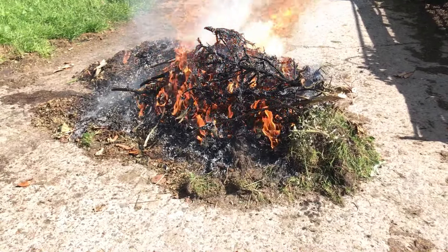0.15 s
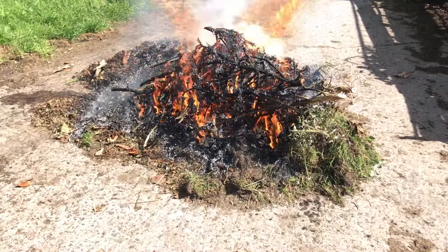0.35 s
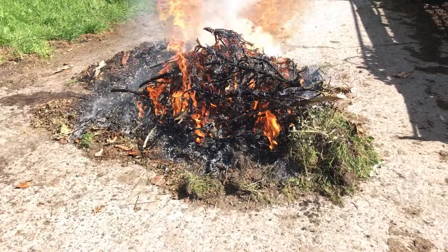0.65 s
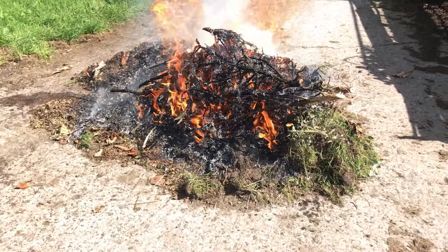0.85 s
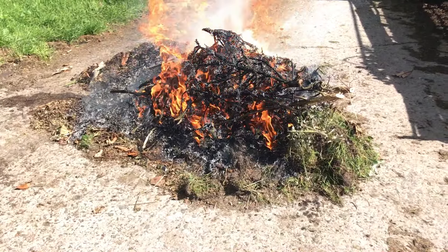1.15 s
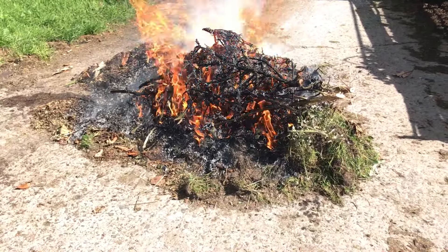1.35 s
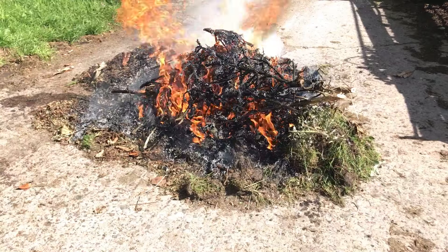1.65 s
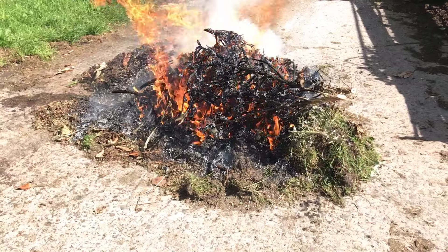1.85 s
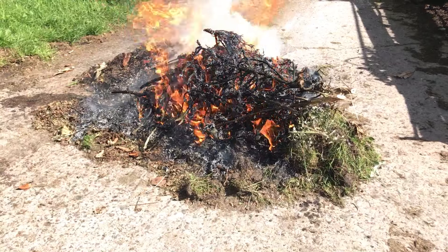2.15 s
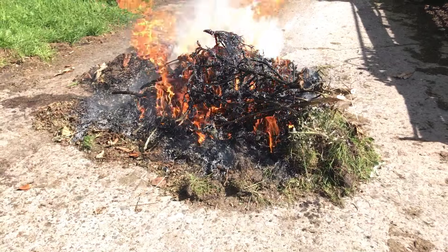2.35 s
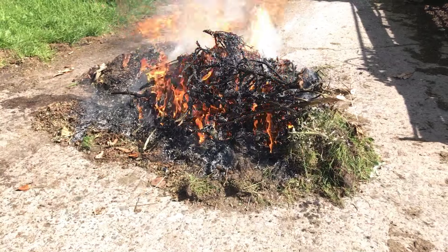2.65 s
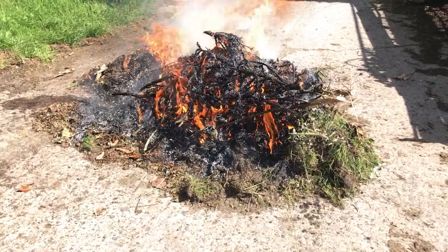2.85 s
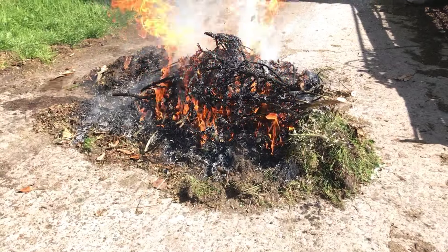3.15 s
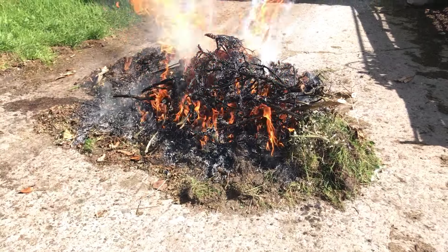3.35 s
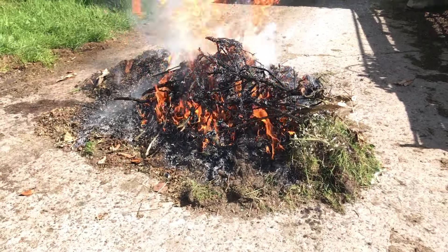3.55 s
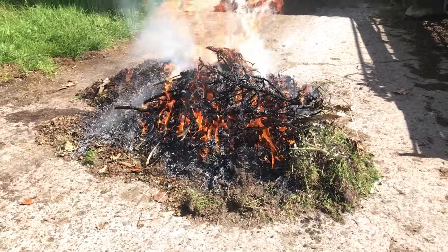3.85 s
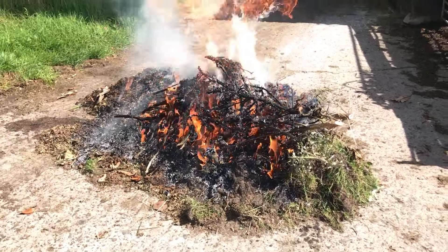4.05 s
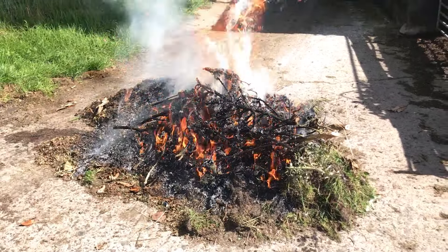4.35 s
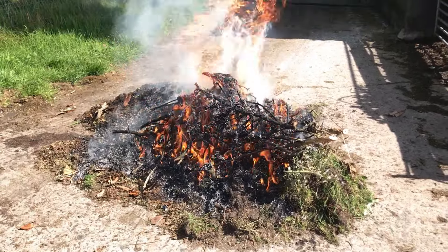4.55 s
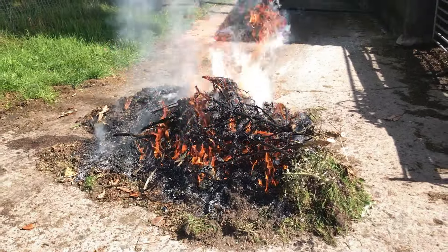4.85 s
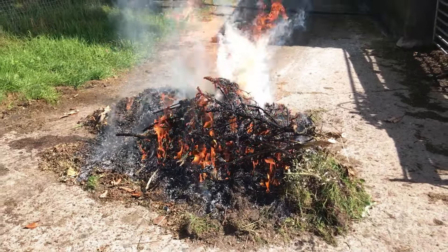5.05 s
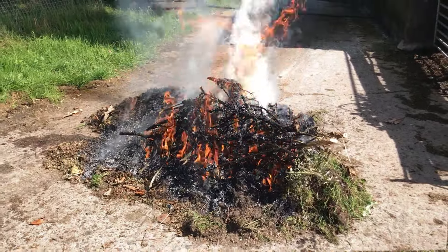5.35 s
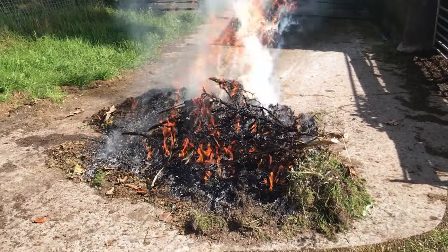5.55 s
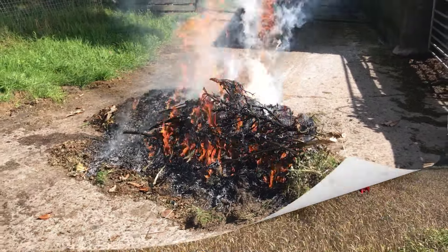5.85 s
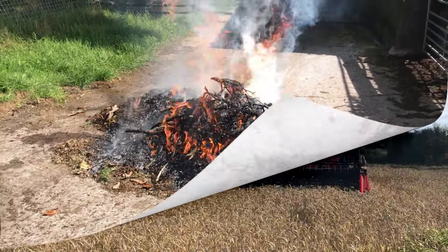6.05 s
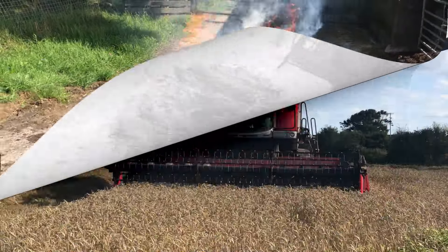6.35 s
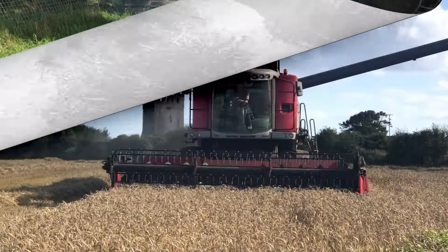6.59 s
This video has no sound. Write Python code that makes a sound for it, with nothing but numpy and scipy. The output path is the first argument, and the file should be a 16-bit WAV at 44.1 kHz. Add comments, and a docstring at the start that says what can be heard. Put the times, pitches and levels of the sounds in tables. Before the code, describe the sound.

A heap of cut weeds burns outdoors, crackling, popping and sizzling over fluttering flames, then fades, is cut off, and a faint distant engine emerges.

```python
"""Hard ground outdoors: a heap of cut weeds burns, fades along a straight ramp and is cut off; a farm machine fades in.
Stems burst as shock fronts with decaying noise, listed and random; smaller cells crackle as random impulses.
Sap sizzles as flickering hiss; turbulent flames rumble and rush as fluttering bands of noise.
A low knock, a damped swing of falling pitch, comes just before the cut; the distant engine is noise over a hum."""
import sys
import numpy as np
from scipy import signal
from scipy.fft import rfft, irfft, next_fast_len
from scipy.io import wavfile

SR = 44100
rng = np.random.default_rng(int(sys.argv[2]) if len(sys.argv) > 2 else 0)


def digitize_waveform(pressure):
    """Quantize a signal to 16-bit integers and store it at the path in sys.argv[1].

    Rows of a 2-D input are taken as channels; values are limited to [-1, 1].
    """
    field = np.atleast_2d(pressure).T
    bounded = np.clip(field, -1, 1)
    quanta = np.round(bounded * 32767).astype(np.int16)
    wavfile.write(sys.argv[1], SR, quanta)


N = 296345

FIRE_END_S = 6.355
FADE_START_S, FADE_ZERO_S = 4.245, 6.67   # the ramp would reach zero only after the cut
# base levels of the fire, before flares, vigour, flutter, filters and fade
BOOM_DB, RUMBLE_DB, RUSH_DB, SIZZLE_DB = -45, -41, -49.5, -38
# share of the flare-ups in the rumble; shares of the vigour in rumble and rush
RUMBLE_FLARES, RUMBLE_FOLLOWS, RUSH_FOLLOWS = 0.35, 0.73, 0.59
HISS_CUTOFF_HZ = 15750   # hiss and crackle pass a steep low-pass
# median rate of cells; level re the hiss before flicker; spread of size and of colour
CRACKLE_PER_S, CRACKLE_DB, CRACKLE_SPREAD_DB, CRACKLE_COLOUR_DB = 450, 1, 4, 4
# decay of a burst and of its fizz; starting level of the fizz; shock re the noise
POP_T60_S, POP_TAIL_T60_S, POP_TAIL_DB, POP_SHOCK_DB = 0.0042, 0.018, -16, 17
# lesser stems: mean energy dB in (middle, low, high), spread of strength and of colour
SMALL_POP_COUNT = 70
SMALL_POP_DB, SMALL_POP_SPREAD_DB, SMALL_POP_COLOUR_DB = (-20, -25, -10.5), 2.5, 3.5
THUMP_S, THUMP_HZ, THUMP_DB, THUMP_T60_S = 6.229, 71, -43.5, 0.23   # the pitch is the one it settles to
THUMP_EXTRA_HZ, THUMP_DROP_S = 880, 0.0029   # extra pitch at the start and its time constant
MACHINE_START_S, MACHINE_FULL_S, MACHINE_NOISE_DB = 6.375, 6.82, -60
CUTOFF_HZ = 16990


def from_db(db):
    """Level to amplitude: 20 dB is a factor of ten."""
    return 10 ** (np.asarray(db) / 20)


def rms_one(x):
    """Normalization to unit mean square along the last axis."""
    return x / np.sqrt(np.mean(x ** 2, axis=-1, keepdims=True) + 1e-20)


def in_time(rows):
    """Linear interpolation of a level contour at every sample."""
    s, level_db = np.transpose(rows)
    return np.interp(np.arange(N) / SR, s, level_db)


def drift(rate_hz):
    """Low-pass random process of unit spread: noise at every 40th sample through two equal poles."""
    r = np.exp(-80 * np.pi * rate_hz / SR)
    noise = rng.standard_normal(N // 40 + 2002)
    slow = signal.lfilter([1], [1, -2 * r, r * r], noise)[2000:]   # drop the settling
    return np.interp(np.arange(N) / 40, np.arange(len(slow)), rms_one(slow))


def coloured(x, spectrum):
    """Spectral shaping: a response interpolated over log frequency weights x, then rms 1."""
    size = next_fast_len(N)
    corner_hz, corner_db = np.array(spectrum).T
    log_hz = np.log(np.arange(size // 2 + 1) * SR / size + 1)
    shape_db = np.interp(log_hz, np.log(corner_hz), corner_db, left=-90, right=-90)
    return rms_one(irfft(rfft(x, size) * from_db(shape_db), size)[:N])


def split(x):
    """Complementary band splitting: middle, low and high parts sum to the input above the floor."""
    # band edges [f/Hz]: floor of the low band, low to middle, middle to high
    edges_hz = (900, 2500, 8000)
    floor_hz, low_hz, high_hz = edges_hz
    x = signal.sosfilt(signal.butter(3, floor_hz, "high", fs=SR, output="sos"), x)
    low = signal.sosfiltfilt(signal.butter(2, low_hz, fs=SR, output="sos"), x)
    high = signal.sosfiltfilt(signal.butter(2, high_hz, "high", fs=SR, output="sos"), x)
    return x - low - high, low, high


def steep_low_pass(x, hz):
    """Elliptic filtering: a steep edge bought with ripple in pass band and stop band."""
    return signal.sosfilt(signal.ellip(12, .5, 70, hz, fs=SR, output="sos"), x)


def flare_db():
    """Transient gain: each flare-up swells and sinks as a Gaussian bell in dB."""
    # deep flare-ups of the flames: t/s at the top, level/dB above the steady boom, half width/s (to 1/e)
    flares = [(0.33, 8.5, 0.22), (2.53, 9.5, 0.043), (2.9, 5.5, 0.063), (3.36, 4.5, 0.099), (3.7, 3, .1),
              (4.27, 6, 0.064)]
    t = np.arange(N) / SR
    return sum(rise_db * np.exp(-((t - s) / width) ** 2) for s, rise_db, width in flares)


def vigour_db():
    """Common modulation: one slow contour drives several sounds of the burning."""
    # vigour of the burning, before the fade: t/s, level/dB
    contour = [(0, -0.5), (0.3, -2.5), (0.7, 1.5), (1.5, -1), (2.0, 0.3), (2.6, 0.5), (3.2, -0.5), (3.7, 0),
               (4.2, -0.5), (4.8, -0.5), (5.4, 0), (5.9, -2.5), (6.35, 0.5)]
    return in_time(contour)


def flames(spectrum, flutter_db, rate_hz):
    """Turbulence noise: burning gas gives coloured noise whose level flutters."""
    return coloured(rng.standard_normal(N), spectrum) * from_db(flutter_db * drift(rate_hz))


def boom(flare):
    """Low-frequency turbulence noise, amplitude modulated by the flare-ups."""
    # deepest colour of the flames: f/Hz, relative level/dB per Hz
    boom_colour = [(18, -33.5), (28, -18.5), (42, -1), (58, 2.5), (80, -4.5), (120, -32.5)]
    return from_db(BOOM_DB + flare) * flames(boom_colour, flutter_db=1.5, rate_hz=4.0)


def rumble(flare, vigour):
    """Turbulence noise above the boom, modulated by part of the flare-ups and of the vigour."""
    # colour of the rumble: f/Hz, relative level/dB per Hz
    rumble_colour = [(50, -17.5), (85, 1.5), (140, -3.5), (250, -14), (345, -13), (480, -22.5), (700, -53)]
    level_db = RUMBLE_DB + RUMBLE_FLARES * flare + RUMBLE_FOLLOWS * vigour
    return from_db(level_db) * flames(rumble_colour, flutter_db=1.0, rate_hz=13.0)


def rush(vigour):
    """Mid-frequency turbulence noise with fast flutter, modulated by part of the vigour."""
    # colour of the rush: f/Hz, relative level/dB per Hz
    rush_colour = [(350, -44.5), (550, -0.5), (800, -1), (1100, 2), (1500, 1.5), (1800, -10), (2600, -30.5)]
    return from_db(RUSH_DB + RUSH_FOLLOWS * vigour) * flames(rush_colour, flutter_db=2.0, rate_hz=31.0)


def upper_rush():
    """Higher turbulence noise, amplitude modulated by a contour of its own."""
    # colour of the upper rush: f/Hz, relative level/dB per Hz
    upper_colour = [(1300, -31.5), (1650, -1), (2150, -2.5), (2500, -10.5), (3200, -36)]
    # its contour: t/s, level/dB above the base level of the rush
    upper_level = [(0, -9.5), (2.3, -6.5), (2.62, 0.5), (3.0, -9), (3.3, -9), (3.5, 0.5), (4.1, -3.5),
                   (4.35, -9), (4.9, -3), (5.8, -7.5), (6.35, -7)]
    level_db = RUSH_DB + in_time(upper_level)
    return from_db(level_db) * flames(upper_colour, flutter_db=2.0, rate_hz=13.0)


def crackle():
    """Clustered random impulses: small cells burst in clumps, many faint, a few stand out, coloured by chance."""
    born = rng.random(N) < CRACKLE_PER_S * from_db(3.0 * drift(8)) / SR
    sizes_db = CRACKLE_SPREAD_DB * np.minimum(rng.exponential(1, N), 3.0)
    snap, fizz = from_db(-60 / (np.array([POP_T60_S, POP_TAIL_T60_S]) * SR))   # decay per sample
    noise, out = rng.standard_normal(N), 0
    for band in range(3):
        colours_db = CRACKLE_COLOUR_DB * rng.standard_normal(N)
        kicks = born * from_db(sizes_db + colours_db) + 1e-9
        fall = signal.lfilter([1], [1, -snap], kicks)
        fall = fall + signal.lfilter([from_db(POP_TAIL_DB)], [1, -fizz], kicks)
        out = out + split(noise * fall)[band]
    return rms_one(out)


def sizzle():
    """Amplitude-modulated noise: sap boils out as fine flickering hiss, with the crackle on top."""
    # shaping of hiss and crackle together: f/Hz, relative level/dB per Hz
    sizzle_colour = [(500, -34.5), (1200, -15), (2500, -2), (5500, -2), (9000, -0.5), (12000, -0.5),
                     (13800, 2.5), (15400, 0.5), (16500, 12)]
    hiss = rng.standard_normal(N) * from_db(0.58 * drift(57))
    both = hiss + from_db(CRACKLE_DB) * crackle()
    return steep_low_pass(coloured(both, sizzle_colour), HISS_CUTOFF_HZ)


def all_pops():
    """Random point process added to listed events: start s, then energy dB in middle, low and high band."""
    # the loudest bursting stems, before the fade: t/s, level/dB (energy in the middle band),
    # low band level/dB above it, high band level/dB above it
    loud_pops = [(0.0131, -19.5, -26, 9), (0.0522, -19, -12, 16), (0.0863, -20, 8.5, 19.5),
                 (0.1831, -14.5, -6, 4), (0.2507, -12.5, -6, -1), (0.3099, -13.5, -8, -4),
                 (0.369, -13, -15, 2), (0.4044, -4, -5, 0), (0.559, -20, -4, 9), (0.609, -20, -24, 15),
                 (0.641, -1, -4.5, 9.5), (0.6521, -8.5, -6, 7), (0.6862, -9, -9, 11),
                 (0.7572, -14.5, -23, 5), (0.7734, -20.5, -16, 17.5), (0.8166, -14.5, -14, 10),
                 (0.8402, -16, -26, 11), (0.8808, -12, -7, 10.5), (0.8898, -18, -4, 2),
                 (0.9381, -10.5, -20, 1), (1.0228, -14.5, -23, 12), (1.0956, -7, -9.5, 12),
                 (1.1084, -17, -1, 7), (1.1785, -6.5, -6, -3), (1.2026, -16, -23, 1),
                 (1.2816, -12, -15, -8), (1.2899, -7.5, -4.5, 9.5), (1.3309, -9.5, -20, -1),
                 (1.3615, -15, -6, -16), (1.4372, -7.5, -26, 2.5), (1.504, -14, -10, -17),
                 (1.6081, -4.5, -12, 12.5), (1.6194, -30, -20, 21), (1.6484, -13, -7, -3),
                 (1.659, -15, 5, -1), (1.7086, -18, 1, 10), (1.7355, -9, 5, -11), (1.7763, -24.5, -6, 15),
                 (1.8276, -9, -6.5, -10), (1.906, -18, -24, 15), (1.9569, -10, -15, 0),
                 (2.0008, -17, -36, 15), (2.0195, -18, -7, 10), (2.0266, -21, -16, 17.5),
                 (2.0617, -5.5, -26, -2), (2.1189, -20, -4, -8), (2.1395, -15.5, -26, 10),
                 (2.2732, -9, -13, -1), (2.3312, -25, -16, 14), (2.3721, -37, -1, 22), (2.395, -9, -7.5, 0),
                 (2.5252, -18, -11, 1), (2.537, -6.5, 2.5, 3), (2.613, -16, -6, 9),
                 (2.6727, -20.5, -26, 16), (2.6941, -8.5, -5, 7), (2.7373, -5, -14, 4.5),
                 (2.7806, -7.5, -14, 0), (2.7966, -12, -4, -17), (2.8269, -16, -1, 6),
                 (2.8537, -9.5, -7, 10.5), (2.8966, -12.5, -5, 6), (2.9593, -2, -15, 11.5),
                 (2.9786, -18.5, -23, -3), (3.0308, -19.5, 4, 12), (3.0648, -15.5, -17, 0),
                 (3.1044, -17, 6.5, -10), (3.1076, -10, -24, -10), (3.1222, -13, -32, 1),
                 (3.184, -15.5, -3, 7), (3.338, -14.5, -10, 11), (3.364, -5, -11, 1),
                 (3.4899, -6.5, -8, -2), (3.5032, -3.5, -9, 10), (3.5129, -12, -9, 3),
                 (3.5476, -18, 0.5, 10), (3.6355, -20.5, -10, 14), (3.7578, -4, -21, 3.5),
                 (3.913, -23.5, 1, 6), (4.1078, -9.5, -19, -4), (4.1616, -26, -7, 16),
                 (4.2365, -31, -9, 16), (4.3313, -3, -2, 1.5), (4.599, -16, -3, -19), (4.613, -18, -6, 9),
                 (4.696, -18, -24, 10), (4.708, -14.5, -8, 6), (4.7804, -8.5, -31, 5),
                 (4.8203, -17.5, -22, 14), (4.8595, -12, -16, -2), (4.8905, -9, 0, -9),
                 (4.9113, -16, -10, -1), (4.9461, -10.5, -4, 5), (5.0894, -13, -7, -14),
                 (5.0998, -29, -5, 13), (5.1263, -15, -5, -7), (5.207, -20, -14, 14),
                 (5.2365, -11.5, -12, 6), (5.2579, -11.5, 6.5, 2), (5.2668, -12, -3, 4),
                 (5.2753, -4, -4, 5), (5.3268, -29.5, -5, 25.5), (5.3787, -12, -4, 10),
                 (5.4568, -5.5, -12, 4), (5.4911, -17, 2, 13), (5.6007, -14, -2, 3), (5.6742, -8.5, -6, 14),
                 (5.6894, -32, -4, 17), (5.7314, -13, 1, -15), (5.7438, -21.5, 11, -16),
                 (5.8592, -17, -16, 7), (5.8689, -14, -9, -14), (5.9148, -21, -32, 8),
                 (5.9221, -19, -7, 14), (5.9908, -23, -10, 14), (5.9936, -17, 1, 4),
                 (6.0508, -15.5, -2, -1), (6.086, -12, -6, 12.5), (6.2998, -12, -0.5, 4)]
    s, mid_db, low_db, high_db = np.transpose(loud_pops)
    small_s = rng.random(SMALL_POP_COUNT) * FIRE_END_S + .001
    chance = rng.standard_normal((SMALL_POP_COUNT, 4))   # strength, then colour of three bands
    small_db = SMALL_POP_DB + SMALL_POP_SPREAD_DB * chance[:, :1] + SMALL_POP_COLOUR_DB * chance[:, 1:]
    loud_db = [mid_db, mid_db + low_db, mid_db + high_db]
    return np.append(s, small_s), np.hstack([loud_db, small_db.T])


def bursts(count, lead):
    """Impulsive release: a shock front, then splinter noise dying in a few ms, with a faint longer fizz."""
    t = np.arange(round(.025 * SR)) / SR
    fall = from_db(-60 * t / POP_T60_S) + from_db(POP_TAIL_DB - 60 * t / POP_TAIL_T60_S)
    shots = rng.standard_normal((count, len(t))) * fall   # one burst a row
    shots[:, 0] = from_db(POP_SHOCK_DB)
    return np.pad(shots, [(0, 0), (lead, 0)])


def pops(lead=24):
    """Superposition of impulsive releases: each stem bursts with its own low, middle and high energy."""
    s, levels_db = all_pops()
    raw = bursts(count=len(s), lead=lead)   # the lead leaves room for the two-way filters
    unit_energy = [rms_one(part) / np.sqrt(raw.shape[1]) for part in split(raw)]
    shots = np.einsum("be,bet->et", from_db(levels_db), unit_energy)   # sum over bands
    out = np.zeros(N + SR)
    for start, shot in zip(np.round(s * SR).astype(int) - lead, shots):
        out[start:start + len(shot)] += shot
    return out[:N]


def dips(x):
    """Comb-like coloration: a chain of cuts, each subtracting part of a resonant band."""
    # narrow dips, nearly evenly spaced like those of a short echo: f/Hz, width/Hz, level/dB
    cuts = [(2250, 500, -2.5), (4900, 400, -3), (7700, 600, -5), (10400, 600, -6), (13500, 700, -2.5)]
    for hz, width_hz, depth_db in cuts:
        r = np.exp(-np.pi * width_hz / SR)
        zeros = np.array([1, 0, -1]) * (1 - r * r) / 2
        poles = [1, -2 * r * np.cos(2 * np.pi * hz / SR), r * r]
        x = x + (from_db(depth_db) - 1) * signal.lfilter(zeros, poles, x)
    return x


def thump():
    """Damped oscillation: a dull low knock whose pitch falls fast from a brighter start."""
    t = np.maximum(np.arange(N) / SR - THUMP_S, 0)
    turns = THUMP_HZ * t + THUMP_EXTRA_HZ * THUMP_DROP_S * (1 - np.exp(-t / THUMP_DROP_S))
    return from_db(THUMP_DB - 60 * t / THUMP_T60_S) * np.sin(2 * np.pi * turns)


def machine():
    """Tones in broadband noise: a far engine, noise over a low hum, fading in along a straight ramp."""
    # colour of the engine noise: f/Hz, relative level/dB per Hz
    machine_colour = [(15, -40), (25, -11), (49, -6), (81, -8), (118, -6), (257, -12.5), (1630, -25),
                      (15000, -47)]
    # steady tones of the hum at full fade-in: f/Hz, level/dB (rms)
    machine_hum = [(53.8, -73), (113.0, -64)]
    t = np.arange(N) / SR
    hum = sum(np.sqrt(2) * from_db(level_db) * np.sin(2 * np.pi * hz * t) for hz, level_db in machine_hum)
    noise = from_db(MACHINE_NOISE_DB) * coloured(rng.standard_normal(N), machine_colour)
    fade_in = np.clip((t - MACHINE_START_S) / (MACHINE_FULL_S - MACHINE_START_S), 0, 1)
    return fade_in * (hum + noise)


def scene():
    """Linear superposition: the fading fire and the knock share one cut; the machine follows."""
    t = np.arange(N) / SR
    flare, vigour = flare_db(), vigour_db()
    deep = boom(flare) + rumble(flare, vigour)
    bright = rush(vigour) + upper_rush() + from_db(SIZZLE_DB + vigour) * sizzle() + pops()
    fire = deep + dips(bright)
    fade = np.clip((FADE_ZERO_S - t) / (FADE_ZERO_S - FADE_START_S), 0, 1)
    burning = np.clip((FIRE_END_S - t) / 0.0028, 0, 1)   # cut off within a few ms
    return ((fire * fade + thump()) * burning + machine())[None]


def record(dry):
    """Band limiting and overload: a low-pass cuts the top, peaks beyond full scale clip, the low-pass acts again."""
    low_pass = signal.cheby2(16, 50, CUTOFF_HZ, fs=SR, output="sos")
    clipped = np.clip(signal.sosfilt(low_pass, dry), -1, 1)
    return signal.sosfilt(low_pass, clipped)


dry = scene()
out = record(dry)
digitize_waveform(out)
```